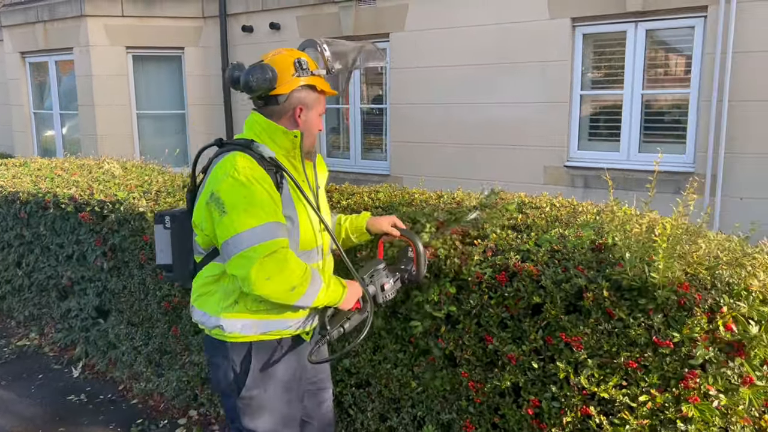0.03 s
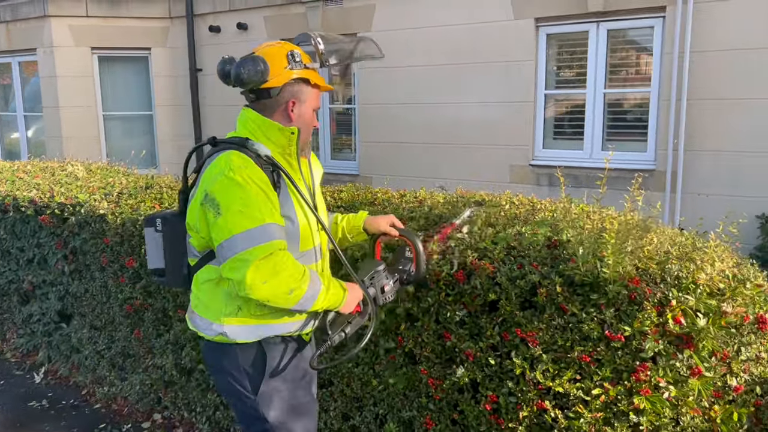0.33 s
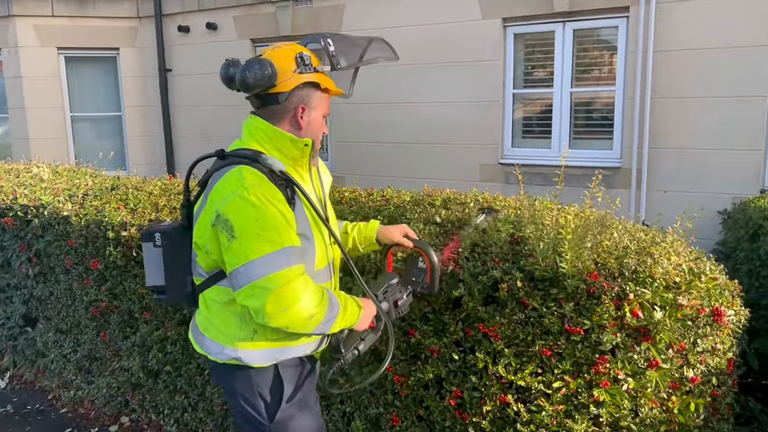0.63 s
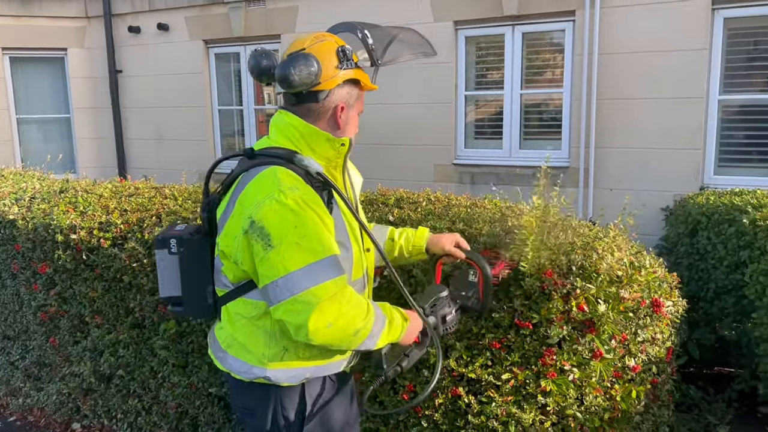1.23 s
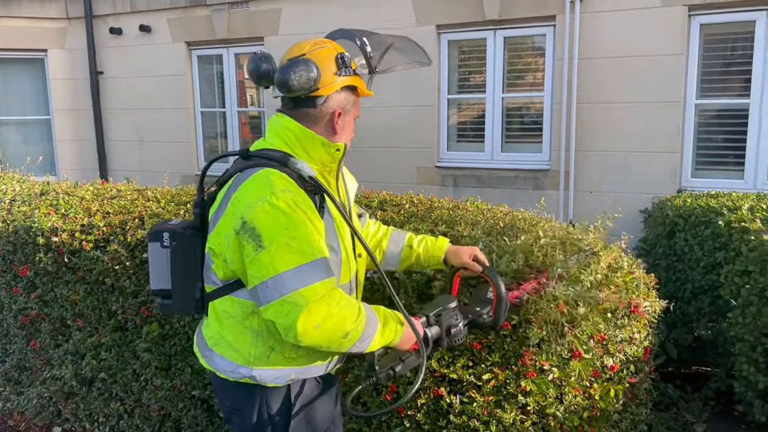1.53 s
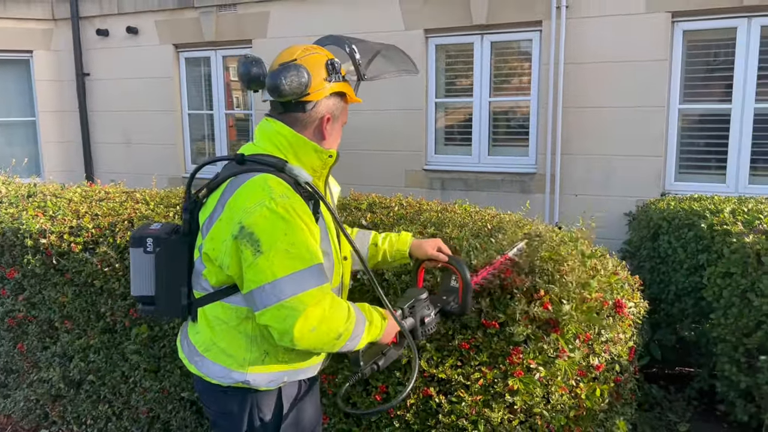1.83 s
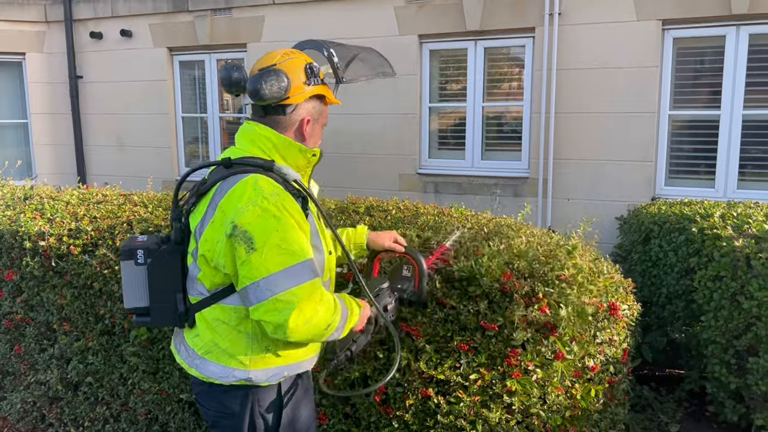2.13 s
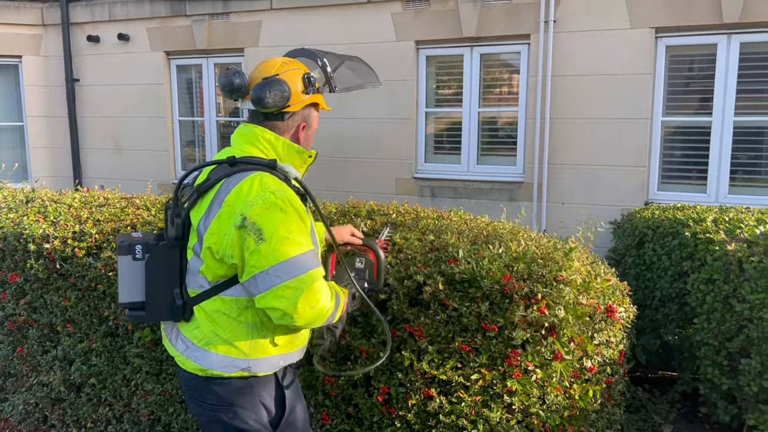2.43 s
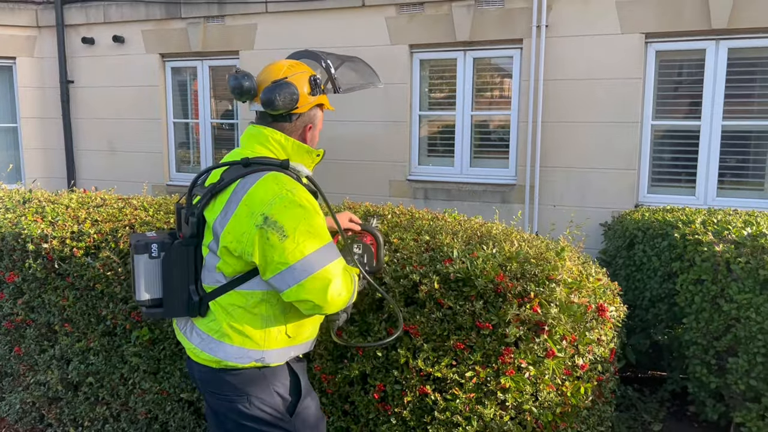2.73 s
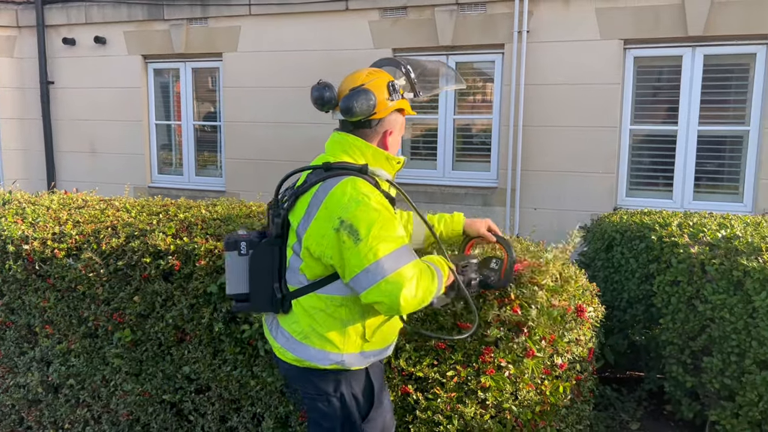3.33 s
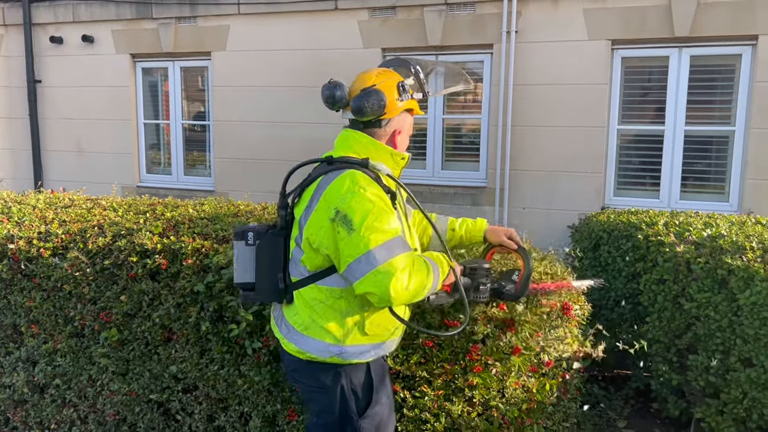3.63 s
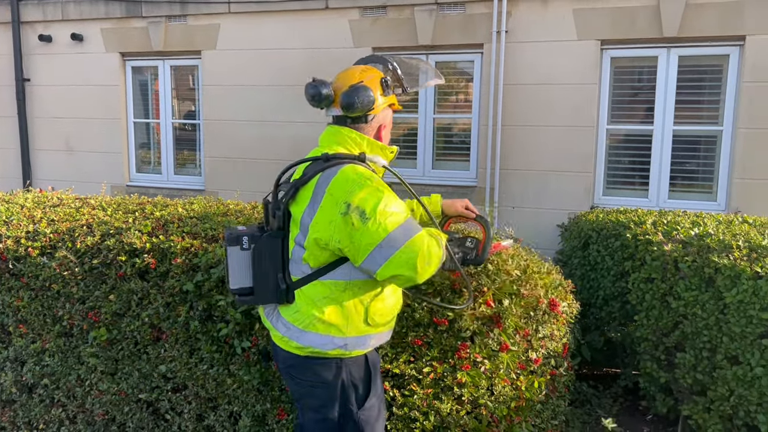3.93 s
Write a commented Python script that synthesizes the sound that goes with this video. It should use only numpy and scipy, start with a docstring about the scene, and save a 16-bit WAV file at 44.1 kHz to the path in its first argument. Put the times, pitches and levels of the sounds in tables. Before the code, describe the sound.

An electric hedge trimmer runs with hissing blades and a thin whine, cutting leafy twigs.

```python
"""Battery hedge trimmer by a house wall

The motor hums and its pinion whines; the blades clack at each end of their stroke and hiss and
squeak as steel slides on steel. Twigs snap between the teeth, leaves rustle, the wall echoes,
and a light breeze brushes the mono microphone a few metres away."""
import sys
import numpy as np
from scipy import signal
from scipy.fft import rfft, irfft
from scipy.io import wavfile
from scipy.ndimage import uniform_filter1d

SR = 44100
rng = np.random.default_rng(int(sys.argv[2]) if len(sys.argv) > 2 else 0)


def to_wav(sig):
    """Store sig (one row per channel, or 1-D mono) as 16-bit WAV at the path in sys.argv[1].

    Samples outside -1..1 are clipped; the rate is SR.
    """
    pcm = np.clip(np.atleast_2d(sig), -1, 1) * 32767
    pcm = np.round(pcm).astype(np.int16)
    wavfile.write(sys.argv[1], SR, pcm.T)  # frames by channels


N = 176400

# levels as the tool swings (time [s], blade clatter [dB], steel hiss [dB], leaf rustle [dB])
SWING_LEVELS = [(0.0, -40, -41.5, -48.0), (0.15, -45, -40.5, -47.5), (0.4, -42, -42, -48),
                (0.65, -43.5, -41.5, -48.0), (0.88, -43.5, -41, -48.5), (1.38, -41.5, -40.5, -48),
                (1.62, -42.5, -42.5, -47.5), (1.95, -41, -40.0, -48.5), (2.2, -44.0, -41, -48.5),
                (2.42, -44.0, -42, -49.5), (2.55, -45, -44, -49), (2.75, -46.5, -45, -50.0),
                (2.95, -45.5, -42.5, -49), (3.15, -45.0, -43.0, -48), (3.42, -44, -43.5, -48),
                (3.6, -43, -41.5, -48.5), (3.82, -43, -43.0, -48), (4.0, -47, -46.0, -47)]
# blade bar resonances (frequency [Hz], width [Hz], level [dB])
BAR_MODES = [(1044, 174, 3.5), (1570, 350, -2.5), (1844, 110, 2.5), (2087, 247, 4), (2445, 380, -1.5),
             (3920, 370, -16.5)]
# sliding steel resonances (frequency [Hz], width [Hz], level [dB])
STEEL_MODES = [(4660, 410, -8), (5600, 110, -8), (6370, 264, -5.5), (6870, 330, -3), (7340, 360, -0.5),
               (7620, 93, -7), (8330, 790, -12.5)]
# spectrum of cut leaves (frequency [Hz], level [dB])
LEAF_SPECTRUM = [(150, -24.5), (300, -6), (450, -3.5), (800, 2.5), (1350, -4), (3000, 0.5), (4300, 4.5),
                 (5200, -2), (8500, -8), (10000, -7), (12000, -12.5), (16000, -9)]


def undb(db):
    """Decibels to gain."""
    return np.exp(np.asarray(db) * np.log(10) / 20)


def unit(x):
    """Scale to rms 1."""
    return x / np.sqrt(np.mean(x ** 2))


def curve(table, column=1):
    """One table column, linearly interpolated in time."""
    rows = np.array(table, float)
    return np.interp(np.arange(N) / SR, rows[:, 0], rows[:, column])


def wander(rate_hz):
    """Smooth random drift, rms 1."""
    hold = int(SR / rate_hz)
    steps = np.repeat(rng.standard_normal(N)[:N // hold + 1], hold)
    return unit(uniform_filter1d(steps, hold)[:N])


def grains(spread_db):
    """Dense tiny clicks of unequal size, rms 1."""
    size = np.repeat(rng.exponential(size=N), 6)[:N]
    return unit(rng.standard_normal(N) * undb(spread_db * np.minimum(size, 3)))


def colour(x, spectrum):
    """Shape x by (frequency [Hz], level [dB]) points; rms 1."""
    hz, db = np.array(spectrum, float).T
    bin_hz = np.maximum(np.arange(N // 2 + 1) * SR / N, 1)
    gain = undb(np.interp(np.log(bin_hz), np.log(hz), db))
    return unit(irfft(rfft(x) * gain, N))


def ring(x, hz, width_hz):
    """Resonance with steep skirts: two peak filters in series."""
    b, a = signal.iirpeak(hz, hz / (width_hz * np.pi / 2), fs=SR)
    return signal.lfilter(b, a, signal.lfilter(b, a, x))


def contact(force, modes, flicker_db=0):
    """Gritty contact rings each mode at its own spot, now harder, now softer; rms 1."""
    out = np.zeros(N)
    for hz, width_hz, db in modes:
        gain = undb(db + flicker_db * wander(rate_hz=45))
        out += gain * ring(force * grains(spread_db=3), hz, width_hz)
    return unit(out)


def stroke_ends(crank_turns):
    """Sample indices where the blades reverse, twice per crank turn."""
    return np.flatnonzero(np.diff(np.floor(2 * crank_turns)))


def breeze():
    """Soft gusts rumble on the microphone."""
    # gusts (time [s], level [dB])
    gust_levels = [(0, -72), (.52, -76), (.6, -62.5), (.85, -59.5), (.92, -63), (.97, -64), (1.02, -70),
                   (1.12, -68), (1.18, -62), (1.25, -59), (1.4, -56.5), (1.57, -66.5), (1.68, -61.5),
                   (1.78, -70), (1.86, -62), (1.94, -80), (2.65, -74.5), (2.8, -68), (3.05, -78),
                   (3.5, -69), (4, -84)]
    # wind rumble (frequency [Hz], level [dB])
    wind_spectrum = [(15, -10), (35, -9.5), (58, -0.5), (100, -5), (170, -8.5), (260, -12), (600, -36),
                     (2000, -70)]
    return colour(rng.standard_normal(N), wind_spectrum) * undb(curve(gust_levels))


def yard(x):
    """Adds a wall echo and a short scattered tail; both shift as the worker walks."""
    wall_s, wall_db, walk_m_s = .0137, -17, .25
    t60_s, tail_db, crossfade_s = .49, -11, .25
    t = np.arange(N) / SR
    wall = np.interp(t - wall_s - 2 * walk_m_s * t / 343, t, x, left=0)
    age = t[:SR // 3]
    decay = undb(-60 * age / t60_s) * (age > wall_s)
    tail = np.zeros(N + SR)
    for centre_s in np.arange(0, t[-1] + crossfade_s, crossfade_s):
        response = rng.standard_normal(len(age)) * decay
        near = np.flatnonzero(abs(t - centre_s) < crossfade_s)
        fade = np.sqrt(1 - abs(t[near] - centre_s) / crossfade_s)
        echo = signal.fftconvolve(x[near] * fade, response / np.linalg.norm(response))
        tail[near[0]:near[0] + len(echo)] += echo
    return x + undb(wall_db) * wall + undb(tail_db) * tail[:N]


def motor(mesh_cycles):
    """The shaft hums at one cycle per turn, the pinion whines at one per tooth; cooling air rushes."""
    # gear whine (time [s], level [dB])
    whine_levels = [(0, -48.5), (.2, -62), (.5, -52), (.78, -54), (.9, -45), (.98, -55), (1.07, -45),
                    (1.18, -61), (1.85, -59), (2.03, -48), (2.2, -53), (2.43, -43.5), (2.56, -53),
                    (2.72, -46.5), (3.02, -43), (3.18, -45.5), (3.3, -51.5), (3.53, -43.5), (3.82, -45.5),
                    (4, -59)]
    # cooling air (frequency [Hz], level [dB])
    air_spectrum = [(200, -29), (500, -3), (3000, -3), (8000, -6), (12000, -2), (16000, 1.5)]
    pinion_teeth = 17
    hum_db = -69 - 2 * wander(rate_hz=7)
    whine_db = curve(whine_levels) + 1.4 * wander(rate_hz=35)
    hum = np.sin(2 * np.pi * mesh_cycles / pinion_teeth) * undb(hum_db)
    whine = np.sin(2 * np.pi * mesh_cycles) * undb(whine_db)
    air = colour(rng.standard_normal(N), air_spectrum) * undb(-55)
    return np.sqrt(2) * (hum + whine) + air


def leaves():
    """Leaves of many sizes crunch, each band in its own quick spurts."""
    # rustle band centres (frequency [Hz])
    bands_hz = [200, 800, 1500, 2800, 3800, 5500, 8000, 10500, 16000]
    spectrum = rfft(colour(grains(spread_db=4.5), LEAF_SPECTRUM))
    bin_hz = np.arange(len(spectrum)) * SR / N
    rustle = np.zeros(N)
    for weights in np.eye(len(bands_hz)):
        band = irfft(spectrum * np.interp(bin_hz, bands_hz, weights), N)
        rustle += band * undb(1.3 * wander(rate_hz=70))
    return unit(rustle) * undb(curve(SWING_LEVELS, column=3) + 3.5)


def twigs():
    """Thicker twigs crack and jolt the bar and the steel teeth."""
    # twig cuts (time [s], level [dB])
    cuts = [(0.039, -41.5), (0.108, -37.5), (0.167, -37), (0.245, -38), (0.264, -37), (0.416, -44),
            (0.788, -35.5), (0.826, -36.5), (0.927, -39), (0.941, -42.5), (1.056, -39), (1.247, -41),
            (1.36, -43), (1.4, -44), (1.451, -43), (1.587, -42), (1.982, -49), (3.245, -44)]
    rise_s, decay_s = .0029, .0069
    t = np.arange(N) / SR
    bite = np.zeros(N)
    for start_s, db in cuts:
        age = np.maximum(t - start_s, 0)
        bite += 2 * undb(db) * (1 - np.exp(-age / rise_s)) * np.exp(-age / decay_s)
    jolt = contact(1, BAR_MODES) + undb(1) * contact(1, STEEL_MODES)
    crack = undb(-2) * colour(grains(spread_db=4.5), LEAF_SPECTRUM)
    return bite * (jolt + crack)


def shoots(crank_turns):
    """Now and then a closing tooth snips a thin shoot: a short hard tick."""
    # chance that a stroke meets a shoot (time [s], probability [0-1])
    growth = [(0, .22), (1.3, .25), (2.4, .18), (2.6, .06), (4, .09)]
    # resonances rung by a snip (frequency [Hz], width [Hz], level [dB])
    snip_modes = [(1060, 220, -4), (1856, 170, -1), (2150, 240, -2), (2930, 1400, -8.5)]
    loudest_db, range_db, decay_s = -39, 3, .006
    t = np.arange(N) / SR
    ends = stroke_ends(crank_turns)
    chance, strength = rng.random((len(ends), 2)).T
    size = (chance < curve(growth)[ends]) * undb(loudest_db - range_db * (1 - strength))
    last = np.maximum(np.searchsorted(ends / SR, t) - 1, 0)
    return contact(1, snip_modes) * size[last] * np.exp(-abs(t - ends[last] / SR) / decay_s)


def squeaks():
    """Steel on steel gives many brief, thin squeaks at random pitches."""
    rate_hz, length_s = 420, .009
    low_hz, high_hz, tilt_db_per_khz = 5800, 9400, -2
    length = int(length_s * SR)
    age, window = np.arange(length) / SR, np.hanning(length)
    out = np.zeros(N)
    for when, pitch, strength in rng.random((rate_hz * N // SR, 3)):
        hz = low_hz + pitch * (high_hz - low_hz)
        gain = strength * undb(tilt_db_per_khz * (hz - low_hz) / 1000)
        start = int(when * (N - length))
        out[start:start + length] += gain * window * np.sin(2 * np.pi * hz * age)
    return unit(out) * undb(-50.5)


def clack_force(crank_turns):
    """A short burst of contact at each stroke end, weaker on the return."""
    decay_s, jitter_s, scatter_db, return_db = .0016, .00045, .5, -4.5
    t = np.arange(N) / SR
    ends = stroke_ends(crank_turns)
    timing, strength = rng.standard_normal((len(ends), 2)).T
    times_s = np.sort(ends / SR + jitter_s * timing)
    is_return = np.arange(len(ends)) % 2 == 0
    size = undb(scatter_db * strength + return_db * is_return)
    last = np.maximum(np.searchsorted(times_s, t) - 1, 0)
    return 2 * size[last] * np.exp(-abs(t - times_s[last]) / decay_s)


def blades(crank_turns):
    """Clacks and steady rubbing ring the bar, the steel teeth and the gear case."""
    # gear case as it turns towards the microphone (time [s], level [dB])
    case_levels = [(0, -52), (.8, -54), (1.5, -55), (2.2, -51.5), (2.9, -50.5), (3.5, -54), (4, -52.5)]
    # topmost blade sizzle (time [s], level [dB])
    sizzle_levels = [(0.0, -54), (0.08, -56), (0.12, -52), (0.43, -55), (1.76, -52), (2.61, -56.5),
                     (3.64, -54), (4.0, -59)]
    case_hz, case_width_hz, sizzle_hz, sizzle_width_hz = 595, 99, 16400, 3550
    bar_rub, steel_rub, pulse_depth, lag_turns = .7, 3.3, .058, .08
    knock = clack_force(crank_turns)
    rattle = np.hypot(knock, bar_rub)
    stroke_pulse = 1 + pulse_depth * np.cos(2 * np.pi * 2 * (crank_turns - lag_turns))
    slide = np.hypot(knock, steel_rub) * stroke_pulse
    clatter = contact(rattle, BAR_MODES, flicker_db=.44) * undb(curve(SWING_LEVELS, column=1) - 2)
    hiss = contact(slide, STEEL_MODES, flicker_db=1.4) * undb(curve(SWING_LEVELS, column=2))
    case = contact(slide, [(case_hz, case_width_hz, 0)]) * undb(curve(case_levels) - 3.5)
    sizzle = contact(slide, [(sizzle_hz, sizzle_width_hz, 0)]) * undb(curve(sizzle_levels) + 4.5)
    return clatter + hiss + case + sizzle


def scene():
    """One motor speed drives gears and blades; both channels are alike."""
    # motor speed, sagging in thick growth (time [s], tooth-mesh frequency [Hz])
    motor_speed = [(0, 4755), (.25, 4750), (.55, 4800), (.8, 4760), (.88, 4767), (1, 4738), (1.2, 4768),
                   (1.78, 4785), (1.95, 4745), (2.43, 4763), (2.55, 4738), (2.73, 4791), (3.13, 4768),
                   (3.28, 4738), (3.38, 4763), (3.48, 4752), (3.78, 4789), (3.95, 4738)]
    crank_teeth, speed_jitter = 90, .00058
    mesh_hz = curve(motor_speed) * (1 + speed_jitter * wander(rate_hz=50))
    mesh_cycles = np.cumsum(mesh_hz) / SR
    crank_turns = mesh_cycles / crank_teeth
    cutting = blades(crank_turns) + squeaks() + shoots(crank_turns) + leaves() + twigs()
    sound = yard(cutting) + motor(mesh_cycles) + breeze()
    return np.array([sound, sound])


def record(dry):
    """A steep low-pass cuts the top treble."""
    cutoff_hz = 15650
    return signal.sosfilt(signal.ellip(16, .1, 80, cutoff_hz, fs=SR, output="sos"), dry)


dry = scene()
out = record(dry)
to_wav(out)
```